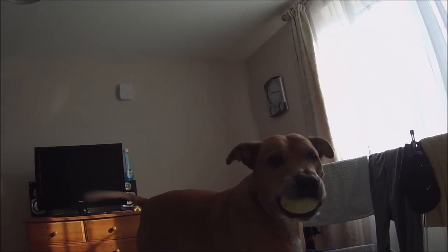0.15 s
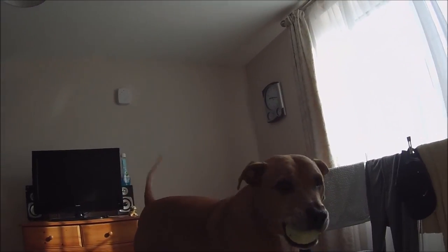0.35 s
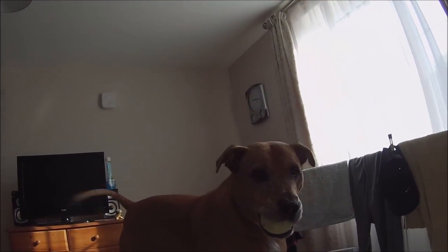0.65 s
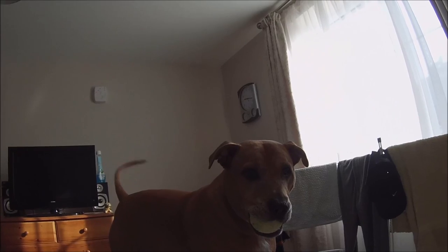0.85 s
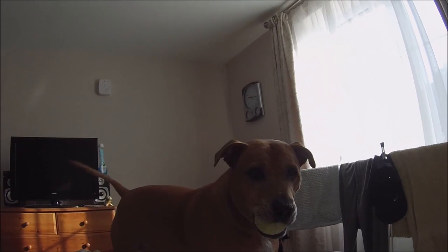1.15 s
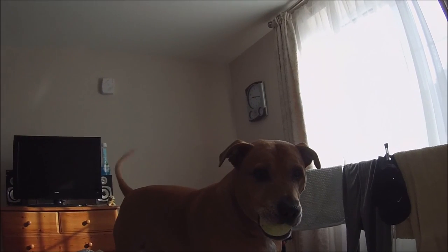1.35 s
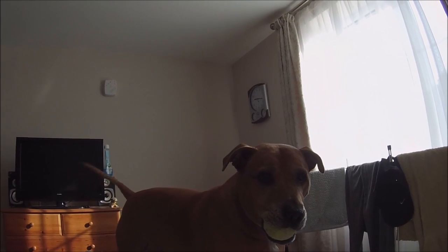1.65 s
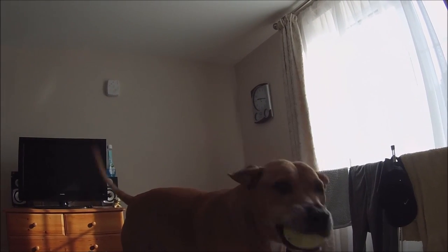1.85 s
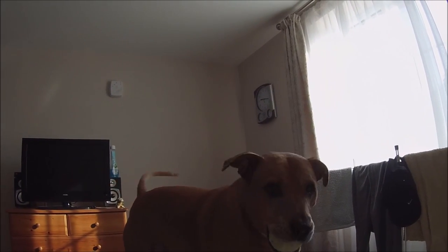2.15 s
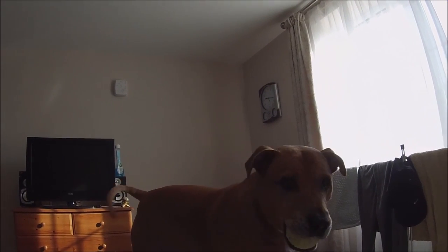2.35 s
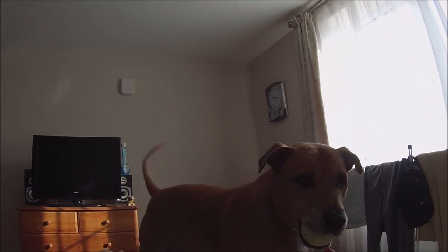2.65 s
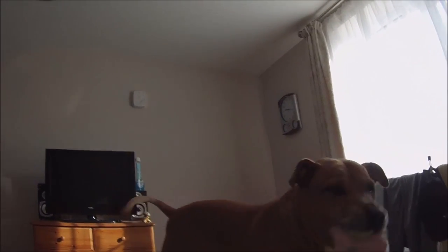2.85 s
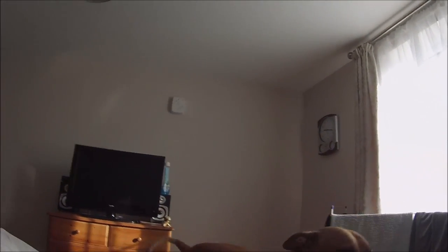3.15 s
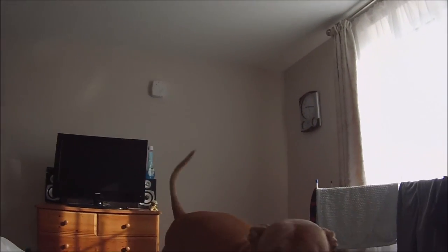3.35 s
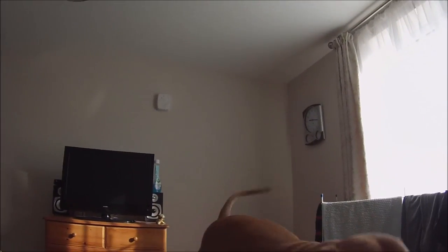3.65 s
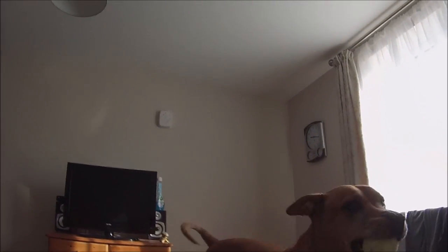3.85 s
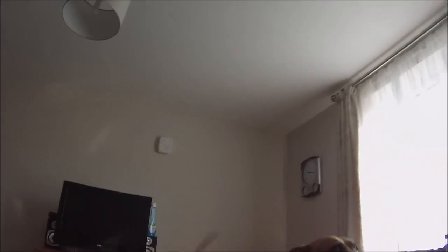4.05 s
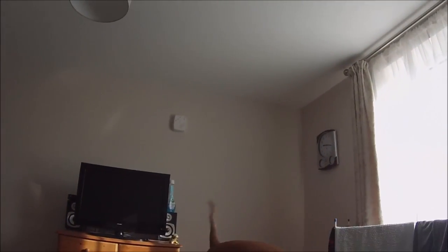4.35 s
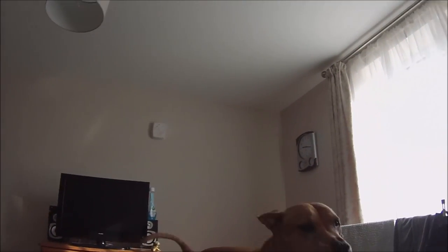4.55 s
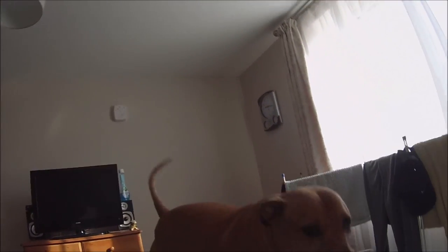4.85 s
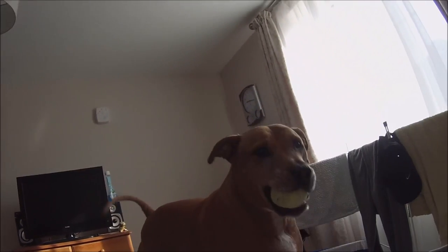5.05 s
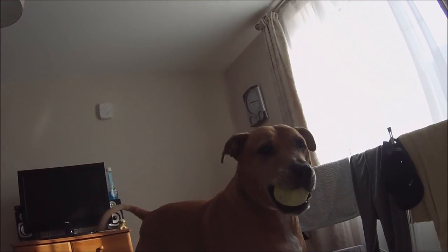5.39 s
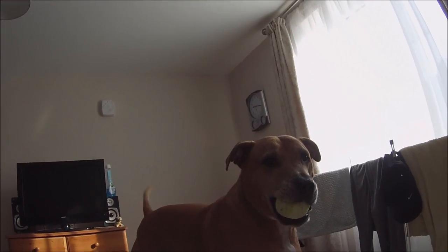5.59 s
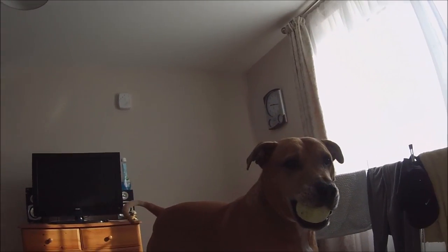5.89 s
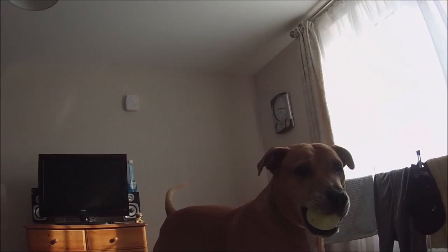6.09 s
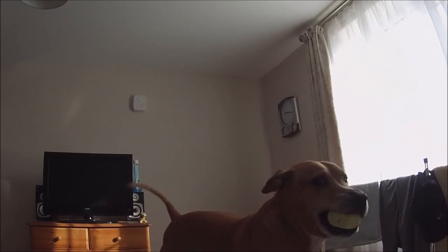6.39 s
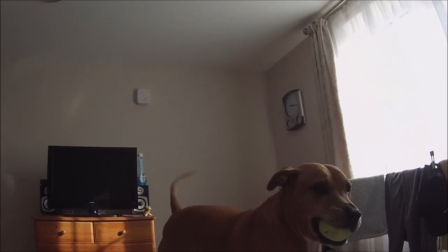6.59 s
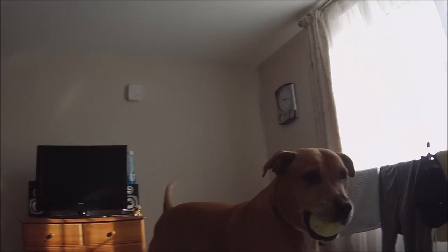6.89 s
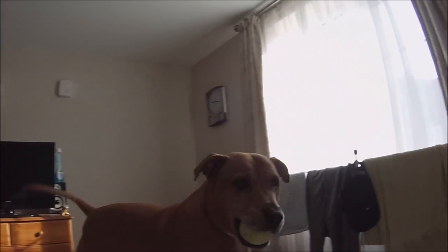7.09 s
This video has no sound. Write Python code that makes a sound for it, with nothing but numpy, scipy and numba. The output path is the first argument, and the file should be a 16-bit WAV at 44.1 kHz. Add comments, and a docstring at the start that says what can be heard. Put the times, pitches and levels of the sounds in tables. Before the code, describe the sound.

Ball-muffled dog growling at close range, pulsing low rumble breaking into raspy snarls with cracks and tiny squeals, wet air drawn between bouts, indoors.

```python
"""A low hum in a small furnished room, and almost at once a dog close by, growling in three bouts
with a ball in its mouth. The growl throbs about 18 times a second, each throb one or more vocal-fold pulses
that ring in chest, throat and mouth. Strain roughens it, opens the jaw and swells into snarls; hard cracks
and brief squeals are added as sounds of their own. Between bouts noise shaped by throat and mouth is the dog
drawing air past the ball; short ringing noise bursts are its lips ticking. Echoes surround the dog."""
import sys
import numpy as np
from scipy import signal
from scipy.fft import rfft, irfft, next_fast_len
from scipy.io import wavfile
from scipy.ndimage import uniform_filter1d, minimum_filter1d
from numba import njit

SR = 44100
rng = np.random.default_rng(int(sys.argv[2]) if len(sys.argv) > 2 else 0)


def to_wav(sig):
    """Store sig (one row per channel, or 1-D mono) as 16-bit WAV at the path in sys.argv[1].

    Samples outside -1..1 are clipped; the rate is SR.
    """
    pcm = np.clip(np.atleast_2d(sig), -1, 1) * 32767
    pcm = np.round(pcm).astype(np.int16)
    wavfile.write(sys.argv[1], SR, pcm.T)  # frames by channels


N = 318843   # length in samples


def from_db(db):
    """Turn decibels into a gain."""
    return 10 ** (np.asarray(db) / 20)


def rms_one(x):
    """Scale a sound to an average (rms) level of 1."""
    return x / np.sqrt(np.mean(x ** 2) + 1e-20)


def in_time(rows):
    """Draw straight lines between a table's points: one curve for each column after the time."""
    seconds, *columns = np.transpose(rows)
    return [np.interp(np.arange(N) / SR, seconds, column) for column in columns]


def gains(tables):
    """Turn the level curves of several stretches into gains, silent between stretches."""
    t = np.arange(N) / SR
    total = 0
    for rows in tables:
        inside = 1. * ((t >= rows[0][0]) & (t <= rows[-1][0]))
        soft_gate = uniform_filter1d(inside, 300)
        total = total + from_db(in_time(rows)) * soft_gate
    return total


def swell(start, attack, hold, release):
    """A rounded rise to 1, a hold and a rounded fall; all times in seconds."""
    corners = start + np.cumsum([0, attack, max(hold, 0), release])
    ramp = np.interp(np.arange(N) / SR, corners, [0, 1, 1, 0])
    return ramp * ramp * (3 - 2 * ramp)


def cut(x, hz, kind, order=2):
    """Keep only the low, high or middle part of a sound (Butterworth filter)."""
    return signal.sosfilt(signal.butter(order, hz, kind, fs=SR, output="sos"), x)


def drift(rate_hz):
    """Random wandering below the given rate, with rms 1."""
    noise = rng.standard_normal(N + SR)
    return rms_one(cut(noise, rate_hz, "low")[SR:])   # drop the filter's first second


def coloured_noise(spectrum):
    """Steady noise with the given spectrum, rms 1."""
    hz, db = np.transpose(spectrum)
    size = next_fast_len(N)
    bins = np.maximum(np.fft.rfftfreq(size, 1 / SR), 1)
    shape = from_db(np.interp(np.log(bins), np.log(hz), db))
    return rms_one(irfft(rfft(rng.standard_normal(size)) * shape, size)[:N])


def resonate(x, modes):
    """Ring a sound in hollows side by side, every other one upside down; rows (hz, width_hz, db)."""
    out = 0
    for k, (hz, width, db) in enumerate(modes):
        r = np.exp(-np.pi * width / SR)
        feedback = [1, -2 * r * np.cos(2 * np.pi * hz / SR), r * r]
        ring = (1 - r * r) / 2 * signal.lfilter([1, 0, -1], feedback, x)
        out = out + (-1) ** k * from_db(db) * ring
    return out


@njit
def moving_resonance(x, hz, width):
    """Ring a sound in one hollow whose pitch and width change from sample to sample."""
    y = np.zeros(len(x))
    for i in range(2, len(x)):
        r = np.exp(-np.pi * width[i] / SR)
        pushed = (1 - r * r) / 2 * (x[i] - x[i - 2])
        y[i] = pushed + 2 * r * np.cos(2 * np.pi * hz[i] / SR) * y[i - 1] - r * r * y[i - 2]
    return y


def moving_low_pass(x, hz, count=6):
    """A steep low-pass whose edge moves: a blend of neighbouring fixed ones."""
    edges = np.geomspace(750, 1400, count)
    out = 0
    for k, edge in enumerate(edges):
        share = np.interp(hz, edges, np.eye(count)[k])
        out = out + share * signal.sosfiltfilt(signal.butter(4, edge, fs=SR, output="sos"), x)
    return out


def even(x, size=4800):
    """Hold the slow level near 1 and keep the throbs."""
    window = signal.windows.hann(size)
    power = np.maximum(signal.fftconvolve(x * x, window / window.sum(), "same"), 0)
    return x / np.sqrt(power + 1e-3 * np.mean(x * x))


def tone(hz, overtones_db, jitter, flutter_db):
    """A slightly unsteady tone with overtones; the lowest partial has rms 1 before the level flutters."""
    phase = 2 * np.pi * np.cumsum(hz * (1 + jitter * drift(69.2))) / SR
    partials = np.sin(phase)
    for k, db in enumerate(overtones_db, 2):
        partials = partials + from_db(db) * np.sin(k * phase)
    return np.sqrt(2) * partials * from_db(flutter_db * drift(84))


# Colour of the still room air: (pitch_hz, level_db per Hz)
ROOM_AIR = [(15, -36.5), (25, 0), (60, -4.5), (98, -7.5), (383, -19.5), (529, -19.5), (637, -16),
            (1060, -28), (2180, -28), (2430, -36), (2700, -30.5), (10600, -45), (15000, -56)]
ROOM_AIR_DB, HUM_HZ, HUM_DB = -53.5, 48.1, -49.5


def background():
    """Still room air is steady noise; the low hum is a pure tone whose level wavers a little."""
    hum = np.sqrt(2) * np.sin(2 * np.pi * HUM_HZ * np.arange(N) / SR) * from_db(0.55 * drift(6))
    return from_db(ROOM_AIR_DB) * coloured_noise(ROOM_AIR) + from_db(HUM_DB) * hum


# Sound bouncing off nearby floor, wall and furniture: (delay_s, level_db)
BOUNCES = [(.0075, -14), (.0103, -11), (.0157, -24), (.0211, -29.5), (.0263, -20.5)]
# a small hard surface close to the microphone reflects the treble
NEAR_DELAY_S, NEAR_DB, NEAR_FROM_HZ = .00224, -10, 1100
HEAD_SWAY_S, HEAD_SWAY_HZ = .00025, 1.2   # each delay wanders as the dog moves its head
TAIL_DB, TAIL_T60_S, WALL_CUT_HZ = -7.5, 0.31, 21000   # T60: time to fade by 60 dB


def echoes(x):
    """A few distinct reflections with wandering delays, plus a dense tail; the furnishings dull both."""
    t, n = np.arange(SR // 2) / SR, np.arange(N)
    fading_noise = rng.standard_normal(len(t)) * from_db(-60 * t / TAIL_T60_S) * (t > .008)
    tail = cut(fading_noise, 200, "high")
    out = signal.fftconvolve(x, from_db(TAIL_DB) * tail / np.linalg.norm(tail))[:N]
    paths = [(x, delay, db) for delay, db in BOUNCES]
    paths.append((cut(x, NEAR_FROM_HZ, "high", order=1), NEAR_DELAY_S, NEAR_DB))
    for sound, delay, db in paths:
        moving_delay = delay + HEAD_SWAY_S * drift(HEAD_SWAY_HZ)
        out = out + from_db(db) * np.interp(n - SR * moving_delay, n, sound)
    return cut(out, WALL_CUT_HZ, "low", order=1)


# Lips and teeth on the ball: (start_s, peak_db before the treble is softened, ring_hz)
LIP_TICKS = [(0.457, -31.5, 4760), (2.958, -39, 890), (3.259, -24.5, 4160), (3.464, -20.5, 2967),
             (3.501, -19.5, 2700), (3.526, -19.5, 2980), (5.208, -40, 2430), (5.909, -41, 2800)]


def lip_ticks(decay_s=0.0027, width_hz=1100):
    """Short wet smacks: fading noise, each ringing in a small pocket of the mouth."""
    out, size = np.zeros(N), SR // 32
    for start, db, hz in LIP_TICKS:
        smack = rng.standard_normal(size) * np.exp(-np.arange(size) / SR / decay_s)
        tick = resonate(smack, [(hz, width_hz, 0)])
        at = int(start * SR)
        out[at:at + size] += from_db(db) * tick / np.abs(tick).max()
    return cut(out, 5500, "low", order=5)


# Faint hums of the vocal folds, one curve per hum: (time_s, pitch_hz, level_db)
FOLD_HUMS = [
    [(2.67, 605, -60), (2.705, 573, -57), (2.74, 507.4, -55.5), (2.785, 490, -56)],
    [(2.79, 196.6, -55), (2.88, 203.5, -49), (2.915, 237, -38), (2.94, 226.6, -49), (2.957, 133.5, -32),
     (2.99, 119, -52)],
    [(4.61, 274.6, -50), (4.645, 264, -42), (4.69, 257.7, -38), (4.73, 248.7, -43), (4.785, 250, -33.5),
     (4.835, 293, -50), (4.86, 279.7, -50)],
]
# Loudness of overtones 2 to 7 against the lowest partial: level_db
FOLD_HUM_OVERTONES = [-16, -11.5, -21, -19, -24, -26]


def fold_hums():
    """Drawn air sets the folds humming in short, thin glides."""
    pitch_hz, _ = in_time([point for hum in FOLD_HUMS for point in hum])
    level, = gains([[(s, db) for s, hz, db in hum] for hum in FOLD_HUMS])
    return level * tone(pitch_hz, FOLD_HUM_OVERTONES, jitter=0.0165, flutter_db=4.0)


# The dog draws air, one curve per draw: (time_s, throat_db, mouth_db, hiss_db, whistle_hz)
AIR_DRAWS = [
    [(2.15, -55.5, -56, -74, 2370), (2.548, -55, -67, -87, 2406), (2.9, -52, -54.5, -64.5, 2350),
     (2.99, -50, -49, -46.5, 2470), (3.03, -59, -56, -50, 2440)],
    [(4.48, -75, -65, -62, 2430), (4.565, -33.5, -50.5, -65, 2363), (4.66, -31.5, -36.5, -55, 2420),
     (4.725, -37, -37, -56, 2385), (4.775, -36.5, -33.5, -52, 2410), (4.825, -34, -37.5, -58, 2120),
     (4.86, -38, -43, -59, 2120), (4.92, -40, -61, -62, 2360), (4.98, -50, -56.5, -83, 2475),
     (5.15, -64, -63, -71, 2540)],
]
# Hollows of the mouth while air is drawn: (pitch_hz, width_hz, level_db)
DRAWING_MOUTH = [(1096, 370, 17.5), (1430, 107, 17), (1690, 180, 12), (2220, 210, 13.5)]
# Colour of air through the teeth with the jaw open, also used in the growl: (pitch_hz, level_db per Hz)
OPEN_TEETH = [(1760, -41), (3000, -7.5), (3620, -13), (4120, -10), (5500, -9.5), (6080, -12.5),
              (6910, -10.5), (8580, -21), (15000, -34)]


def drawn_air(whistle_db=-4, whistle_width_hz=130):
    """Air pulled past the ball: fluttering noise in throat, mouth and teeth, a breathy whistle, fold hums."""
    throat_gain, mouth_gain, hiss_gain = gains([[row[:4] for row in draw] for draw in AIR_DRAWS])
    whistle_hz = in_time([row for draw in AIR_DRAWS for row in draw])[-1]
    flutter = from_db(2.0 * drift(72))
    air = rng.standard_normal(N) * flutter
    # the throat rings at its own pitch in each draw
    throat_hz, = in_time([(row[0], hz) for draw, hz in zip(AIR_DRAWS, [630, 735]) for row in draw])
    throat = moving_resonance(air, throat_hz, np.full(N, 83.))
    throat = throat_gain * rms_one(cut(throat, [480, 1100], "band"))
    whistle = rms_one(moving_resonance(air, whistle_hz, np.full(N, 1. * whistle_width_hz)))
    mouth = rms_one(resonate(air, DRAWING_MOUTH)) + from_db(whistle_db) * whistle
    mouth = mouth_gain * rms_one(cut(mouth, [900, 3000], "band"))
    hiss = hiss_gain * rms_one(coloured_noise(OPEN_TEETH) * flutter)
    return throat + mouth + hiss + fold_hums()


# Brief squeals: (full_level_from_s, hold_s, level_db, first_hz, last_hz)
SQUEAL_GLIDES = [(1.923, 0.024, -19, 640, 693), (3.21, 0.012, -13, 760, 850),
                 (3.322, 0.049, -18.5, 690, 664), (4.018, 0.012, -14.5, 715, 675),
                 (6.451, 0.0675, -16.5, 655, 623.5), (6.758, 0.0098, -16.5, 695, 680)]
# Loudness of overtones 2 and 3 against the lowest partial: level_db
SQUEAL_OVERTONES = [-25, -30.5]
SQUEAL_ATTACK_S, SQUEAL_RELEASE_S = .004, 0.01


def squeals():
    """Short, nearly pure gliding tones in the range of the throat's resonance."""
    points, level = [], 0
    for start, hold, db, first_hz, last_hz in SQUEAL_GLIDES:
        points += [(start, first_hz), (start + hold + SQUEAL_RELEASE_S, last_hz)]
        shape = swell(start - SQUEAL_ATTACK_S, SQUEAL_ATTACK_S, hold, SQUEAL_RELEASE_S)
        level = level + from_db(db) * shape
    pitch_hz, = in_time(points)
    return level * tone(pitch_hz, SQUEAL_OVERTONES, jitter=0.02325, flutter_db=5.5)


# The folds tear apart with a crack: (start_s, peak_db, ring_hz, mouth_db against the throat)
FOLD_CRACKS = [(.2523, -14, 670, -4), (.6035, -14.5, 650, -29), (1.897, -9.5, 1050, -1),
               (1.916, -2.5, 830, -0.5), (3.1795, -5.5, 712, -28), (3.2585, -2, 827, -32),
               (3.2757, -8, 810, -25), (3.5266, -1, 912, -10.5), (3.6668, -7, 844, -16),
               (3.773, -8, 805, -7), (4.063, -8.5, 680, -20), (4.299, -9, 900, 1),
               (6.0285, -15.5, 653, -22.5), (6.3654, -20.5, 625, -22), (6.6346, -9, 630, -23),
               (6.697, -18.5, 686, -27)]


def cracks(width_hz=66):
    """Single hard slaps of the folds that ring in the throat and, more or less brightly, in the mouth."""
    out, click = np.zeros(N), signal.unit_impulse(SR // 16)
    mouth = cut(resonate(click, [(1350, 140, 0)]), [900, 2000], "band")
    for start, db, hz, mouth_db in FOLD_CRACKS:
        throat = resonate(resonate(click, [(hz, width_hz, 0)]), [(hz, 600, 0)])
        crack = throat / np.abs(throat).max() + from_db(mouth_db) * mouth / np.abs(mouth).max()
        at = int(start * SR)
        out[at:at + len(click)] += from_db(db) * crack / np.abs(crack).max()
    return out


# Pushes of breath, each restarts the throbbing: (start_s, accent_db)
BREATH_PUSHES = [(0.15, 5.5), (0.171, -2.5), (0.428, -3.5), (0.603, 2.5), (0.902, 3), (1.067, -1.5),
                 (1.333, -5.5), (1.645, 4), (1.812, -9.5), (3.056, -5), (3.161, 0), (3.468, 12),
                 (3.504, 10.5), (3.772, -1), (3.957, 15.5), (4.062, 4.5), (4.167, 14), (4.234, 13.5),
                 (4.272, 12), (5.166, 13.5), (5.22, 0.5), (5.323, 4), (5.43, 5.5), (5.541, 6.5), (5.648, 0),
                 (5.749, 1.5), (5.904, 0.5), (5.965, -3.5), (6.029, -0.5), (6.18, 2), (6.239, 1),
                 (6.419, -3.5), (6.496, -3.5), (6.608, 4), (6.697, 12), (6.754, 6), (6.81, 9.5), (6.934, 0)]
THROB_HZ = 18.5   # aimed at; whole throbs are fitted between pushes
ACCENT_CARRY = 0.16   # share of a push's accent left in the next throb


def throbs():
    """Even throbs from push to push while the accent wears off: rows (start_s, end_s, accent_db)."""
    rows = []
    ends = [start for start, db in BREATH_PUSHES[1:]] + [N / SR]
    for (start, push_db), end in zip(BREATH_PUSHES, ends):
        count = max(1, round((end - start) * THROB_HZ))
        edges = np.linspace(start, end, count + 1)
        for k in range(count):
            rows.append((edges[k], edges[k + 1], push_db * ACCENT_CARRY ** k))
    return rows


# Pulse strength through one calm throb: (share of the way 0-1, chest_db, throat_db)
THROB_PULSES = [(0, 13, 6), (.25, 2, -4), (.5, -10, -17), (.75, 15, 3.5), (1, 9, -6)]
UNEVEN_POWER = .7   # how soon roughness makes the voice uneven and breathy


def fold_pulses(rough, calm_hz=76, rise_hz=100, jitter=0.22, shimmer_db=7.0):
    """Clicks of the folds in each throb, for chest and throat; a rough voice is faster and less regular."""
    chest, throat = np.zeros((2, N))
    way, chest_db, throat_db = np.transpose(THROB_PULSES)
    for start, end, accent_db in throbs():
        roughness = rough[int(start * SR)]
        uneven = roughness ** UNEVEN_POWER
        count = max(1, round((end - start) * (calm_hz + rise_hz * roughness ** 1.5)))
        phase = np.arange(count) / count
        late, louder = rng.standard_normal((2, count)) * (phase > 0)   # the first pulse is on time
        seconds = start + (end - start) * (phase + late * jitter * uneven / count)
        at = np.clip(seconds * SR, 0, N - 1).astype(int)
        depth = 1 - roughness   # a rough voice throbs less
        extra_db = shimmer_db * uneven * louder + accent_db * (phase == 0)
        chest[at] = from_db(depth * np.interp(phase, way, chest_db) + extra_db / 2)
        throat[at] = from_db(depth * np.interp(phase, way, throat_db) + extra_db)
    return chest, throat


def puffs(clicks, decay_s, steady):
    """Airflow: a fading puff after each pulse on top of a steady leak; rms 1."""
    r = np.exp(-1 / (decay_s * SR))
    puff = rms_one(signal.lfilter([1], [1, -r], clicks + 1e-18))
    return rms_one(puff + steady)


# The steady growl, one curve per bout:
# (time_s, voice_db, strain 0-1, throat_hz, chest_lift_db)
STEADY_GROWLS = [
    [(0.145, -26, 0.09, 545, -24), (0.19, -29, 0.59, 520, 15), (0.5, -25, 0.62, 564, -6.5),
     (0.71, -31.5, 0.5, 533, -4), (0.95, -41, 0.34, 424, -3.5), (1.44, -40, 0.33, 440, -3.5),
     (1.62, -39.5, 0.48, 476, -2), (1.79, -38.5, 0.39, 514, -1), (1.86, -24, 0.81, 620, 4.5),
     (2.04, -29.5, 0.59, 552, 0)],
    [(3.04, -24, 0.63, 482, -0.5), (3.1, -26, 0.83, 560, 2.5), (3.23, -26, 0.7, 757, 2),
     (3.4, -22.5, 0.79, 742, 1), (3.45, -22.5, 0.67, 840, 3), (3.71, -21, 0.85, 863, 0.5),
     (4.07, -25.5, 0.62, 722, -2.5), (4.16, -26.5, 0.68, 735, 0), (4.22, -27.5, 0.57, 926, -6),
     (4.39, -29, 0.78, 827, 0.5)],
    [(5.159, -37, 0.24, 755, -2.5), (5.49, -37.5, 0.21, 692, 0), (5.63, -29.5, 0.36, 708, -0.5),
     (5.8, -30.5, 0.4, 683, -1), (5.9, -24.5, 0.43, 672, -0.5), (6.33, -23.5, 0.59, 630, -1.5),
     (6.38, -19, 0.63, 646.3, -3.5), (6.55, -19.5, 0.71, 597, 0.5), (6.66, -18, 0.71, 665, 1),
     (6.74, -20, 0.66, 698, -1), (6.92, -20.5, 0.6, 661, 0), (7.21, -24.5, 0.55, 632, -3)],
]
# How the ball sits in each bout; chest and hiss levels are those before strain raises them:
# (chest_db, hiss_db, throat_width_hz, mouth_wander_hz, cheek_ring_db)
BALL_GRIPS = [(-38, -74, 280, 46, 0), (-44, -74, 150, 146, -8), (-41.5, -71.5, 70, 50, -10.5)]
ONSET_S, FADE_DB_PER_S = 0.018, 225   # a bout starts at once and dies away after its last point


def bouts():
    """The opening and closing of the three bouts, then the settings each one's grip on the ball gives."""
    t = np.arange(N) / SR
    starts, ends = np.transpose([(curve[0][0], curve[-1][0]) for curve in STEADY_GROWLS])
    bout = np.maximum(np.searchsorted(starts, t) - 1, 0)
    onset = np.clip((t - starts[bout]) / ONSET_S, 0, 1)
    fade = from_db(-FADE_DB_PER_S * np.maximum(t - ends[bout], 0))
    return onset * fade, *np.array(BALL_GRIPS)[bout].T


# Snarls swell out of the growl:
# (start_s, attack_s, hold_s, voice_db, strain 0-1, throat_hz, chest_lift_db)
SNARL_SWELLS = [(0.165, 0.036, 0.05, -18, 0.91, 506, 0), (1.852, 0.052, 0.015, -15, 0.95, 630, -1.5),
                (3.144, 0.038, 0.013, -19.5, 0.8, 702, -1.5), (3.234, 0.02, 0.0082, -25, 0.81, 843, -1),
                (3.272, 0.017, 0.053, -17.5, 0.8, 682, 0.5), (3.489, 0.03, 0.018, -18, 0.8, 974, -0.5),
                (3.565, 0.01, 0.07, -18, 0.73, 893, 3), (3.749, 0.036, 0.053, -18.5, 0.82, 760, -3),
                (3.964, 0.04, 0.025, -20.5, 0.71, 630, 0.5), (4.26, 0.03, 0.025, -14, 0.89, 927, -3),
                (6.355, 0.057, 0.052, -18.5, 0.8, 628, 5)]
SNARL_RELEASE_S = 0.063


def effort():
    """Each snarl pulls voice level, strain, throat pitch and chest lift from the growl to its own values."""
    controls = np.array(in_time([row for curve in STEADY_GROWLS for row in curve]))
    for start, attack, hold, *peak in SNARL_SWELLS:
        pull = swell(start, attack, hold, SNARL_RELEASE_S)
        controls = controls + pull * (np.array(peak)[:, None] - controls)
    voice_db, strain, throat_hz, lift_db = controls
    return voice_db, np.clip(strain, .05, 1), throat_hz, lift_db


# Hollows of the chest: (pitch_hz, width_hz, level_db)
CHEST_HOLLOWS = [(128.1, 102, 8.5), (148.3, 103.6, 7), (191.6, 12, -0.5), (247, 29.3, -8),
                 (331.5, 13, -4.5)]
CHEEK_HZ, CHEEK_WIDTH_HZ = 426.7, 16.4   # the pocket beside the ball rings


def chest_rumble(chest_clicks, source, turbulence, rough, jaw, cheek_db):
    """Pulses and rough air ring in the chest and cheek; an open jaw lets the low mids out directly."""
    drive = rms_one(chest_clicks) + 5.1 * rough * turbulence
    cheek = from_db(cheek_db) * resonate(drive, [(CHEEK_HZ, CHEEK_WIDTH_HZ, 0)])
    low_mids = jaw * resonate(source, [(319, 45, 1.0)])
    chest = resonate(drive, CHEST_HOLLOWS) - cheek + low_mids
    return cut(cut(chest, 101.0, "high", order=4), 600, "low", order=2)


THROAT_WANDER_HZ = 22
JAW_DAMPING_HZ = 250   # a wide jaw broadens the throat resonance
# the throat passes little above an edge that rises with its resonance and with a wide jaw
EDGE_HZ, EDGE_RATIO, EDGE_JAW_HZ = 894, 1.04, 330


def throat_voice(source, throat_hz, grip_width, jaw):
    """The throat's main resonance rides on a broad one just above it, under a moving upper edge."""
    width = grip_width + JAW_DAMPING_HZ * jaw ** 2
    throat_hz = throat_hz + THROAT_WANDER_HZ * drift(8.5)
    throat = moving_resonance(source, throat_hz, width)
    throat = moving_resonance(throat, throat_hz + 130, width + 520)
    edge_hz = np.maximum(EDGE_HZ, EDGE_RATIO * throat_hz) + EDGE_JAW_HZ * jaw ** 4
    return moving_low_pass(throat, edge_hz)


# Hollows of the mouth that open with the jaw: (pitch_hz, width_hz, level_db)
OPEN_MOUTH = [(1090, 79, 27.3), (1290, 780, 21.1), (1720, 560, 21), (1690, 200, 7.3), (2600, 2900, 4.5)]


def mouth_voice(airy, second_hz, second_db, third_hz, third_db, wander_hz, rough, jaw):
    """Breathy pulses ring in two moving hollows of the mouth and in those of the open jaw."""
    second = moving_resonance(airy, second_hz + wander_hz * drift(11.0), 150 + 40 * rough)
    third = moving_resonance(airy, third_hz + wander_hz * jaw * drift(5.9), 90 + 70 * rough)
    mouth = from_db(second_db) * even(second) + from_db(third_db) * even(third)
    mouth = mouth + jaw * even(resonate(airy, OPEN_MOUTH))
    return cut(cut(mouth, 965, "high", order=4), 2014, "low", order=4)


# Colour of air through the teeth with the jaw closed: (pitch_hz, level_db per Hz)
CLOSED_TEETH = [(1880, -5.5), (3200, -11.5), (3670, -30.5), (4140, -14), (4900, -7), (5620, -7.5),
                (6030, -7), (6950, -8.5), (7560, -26), (8660, -33), (9540, -17), (10500, -30), (15000, -34)]
GAP_WANDER_HZ = 100   # the ring of the gap between ball and jaw wavers


def teeth_hiss(jaw, rough, gap_hz, gap_db, clicks, gap_width_hz=230):
    """Air puffs through the teeth: a broad hiss whose colour follows the jaw, and two narrow rings."""
    broad = (1 - jaw) * coloured_noise(CLOSED_TEETH) + jaw * coloured_noise(OPEN_TEETH)
    wavering_hz = gap_hz + GAP_WANDER_HZ * drift(4.3)
    gap = rms_one(moving_resonance(rng.standard_normal(N), wavering_hz, np.full(N, 1. * gap_width_hz)))
    upper = rms_one(resonate(rng.standard_normal(N), [(6950, 73, 0)]))
    rings = from_db(gap_db) * gap + from_db(-14.5) * (1 - jaw) * upper
    rings = cut(rings, [3600, 7600], "band")
    return (broad + rings) * puffs(clicks, decay_s=0.0027, steady=3.0 * rough)


# Tongue and lips shift the mouth's hollows:
# (time_s, second_hz, second_db, third_hz, third_db, gap_hz, gap_db, hiss_lift_db)
TONGUE_AND_LIPS = [(0.2, 1256, 7.5, 2210, -5, 3950, -2, 0), (0.29, 1350, 6.5, 2070, 2.5, 3900, -4.5, 7.5),
                   (0.5, 1450, -1.5, 2314, 3.5, 4600, -17, 1), (0.95, 1510, -5, 2520, -2, 4940, -8.5, -0.5),
                   (1.48, 1340, -5, 2540, -3, 5000, -11, -5), (1.64, 1020, 1, 2440, -5, 5090, -2, -7.5),
                   (1.83, 1130, 8, 2110, -4.5, 4980, -15.5, 1.5),
                   (1.93, 1080, 3.5, 1920, -8, 4360, -29, -2.5), (2.04, 1090, 10, 2270, 5.5, 4160, -3, 4.5),
                   (3.33, 1430, -1.5, 2140, -8, 3800, -8.5, -0.5),
                   (3.52, 1260, 9, 2450, 0.5, 3840, -14, 1.5),
                   (3.62, 1350, -2.5, 2130, -2.5, 4110, 2.5, 0.5),
                   (3.75, 1430, 1, 2540, -8.5, 4640, -5.5, -6.5),
                   (4.06, 1347, 3.5, 2270, 1.5, 4850, -4.5, 2),
                   (4.32, 1376, 3.5, 2074, -5.5, 4160, -3.5, -2),
                   (5.2, 1310, -1.5, 2700, -8, 5780, -3.5, 1), (5.89, 1342, 0, 2540, -19, 5250, -5.5, -1.5),
                   (5.93, 1340, 1, 2380, 1, 4900, -10.5, 0), (6.33, 1250, -2, 2680, -3.5, 4840, -4, -4.5),
                   (6.38, 1040, 9, 2150, -3, 4930, 4.5, -7.5), (6.43, 1235, 5.5, 2196, 0.5, 4380, -9.5, 1),
                   (6.78, 1570, -5, 2400, 5, 4200, 0.5, 0.5), (7.2, 1500, -0.5, 2290, 4.5, 4920, -10.5, -5)]
ROUGH_POWER, JAW_POWER = 1.54, 2.23   # roughness and jaw opening are powers of the strain
LEAK = .15   # steady airflow beside the puffs
RASP_DB, RASP_HZ = 3.2, 30   # in a rough voice the flow also comes in ragged spurts
# what full strain adds, and the mouth's level without strain
CHEST_RISE_DB, HISS_RISE_DB, MOUTH_DB, MOUTH_RISE_DB = 20, 37, -77, 57


def growl():
    """Fold pulses and puffing, turbulent air ring in chest, throat and mouth; air hisses through the teeth."""
    gate, chest_db, hiss_db, grip_width, wander_hz, cheek_db = bouts()
    voice_db, strain, throat_hz, lift_db = effort()
    second_hz, second_db, third_hz, third_db, gap_hz, gap_db, hiss_lift_db = in_time(TONGUE_AND_LIPS)
    rough, jaw = strain ** ROUGH_POWER, strain ** JAW_POWER
    chest_clicks, clicks = fold_pulses(rough)
    # a calm growl is almost pure pulses
    breath = puffs(clicks, decay_s=0.01, steady=LEAK) * rng.standard_normal(N)
    turbulence = rough ** UNEVEN_POWER * breath
    source = rms_one(clicks) + 1.54 * turbulence
    # the mouth gets more turbulence
    spurts = from_db(RASP_DB * np.sqrt(rough) * drift(RASP_HZ))
    mouth_breath = puffs(clicks, decay_s=0.0072, steady=LEAK) * rng.standard_normal(N)
    airy = spurts * (0.79 * source + mouth_breath)

    chest = chest_rumble(chest_clicks, source, turbulence, rough, jaw, cheek_db)
    throat = throat_voice(source, throat_hz, grip_width, jaw)
    mouth = mouth_voice(airy, second_hz, second_db, third_hz, third_db, wander_hz, rough, jaw)
    hiss = spurts * teeth_hiss(jaw, rough, gap_hz, gap_db, chest_clicks)

    voice = from_db(chest_db + CHEST_RISE_DB * strain + lift_db) * even(chest)
    voice = voice + from_db(voice_db) * even(throat)
    voice = voice + from_db(MOUTH_DB + MOUTH_RISE_DB * strain) * mouth
    voice = voice + from_db(hiss_db + HISS_RISE_DB * strain + hiss_lift_db) * even(hiss)
    return gate * voice


def scene():
    """The dog, its echoes and the room's own sound."""
    dog = lip_ticks() + drawn_air() + squeals() + cracks() + growl()
    return (background() + echoes(dog) + dog)[np.newaxis]


def record(dry, ceiling=0.97, size=130):
    """A fast limiter turns down the peaks, then everything above 15050 Hz is cut away."""
    gain = np.minimum(1, ceiling / (np.abs(dry) + 1e-9))
    gain = uniform_filter1d(minimum_filter1d(gain, size), size)   # size in samples
    top_cut = signal.ellip(10, .1, 80, 15050, fs=SR, output="sos")
    return signal.sosfilt(top_cut, dry * gain)


dry = scene()
out = record(dry)
to_wav(out)
```